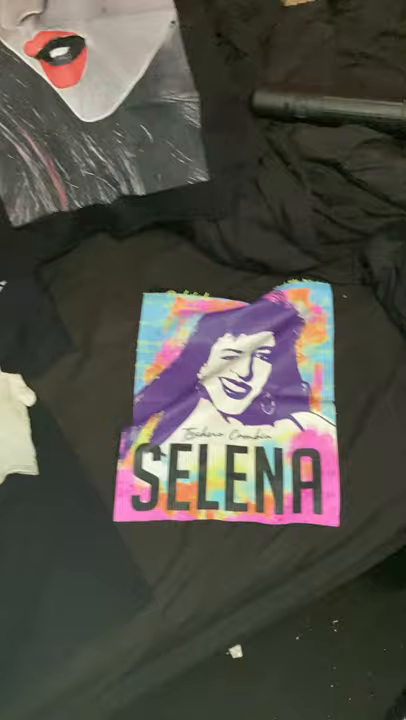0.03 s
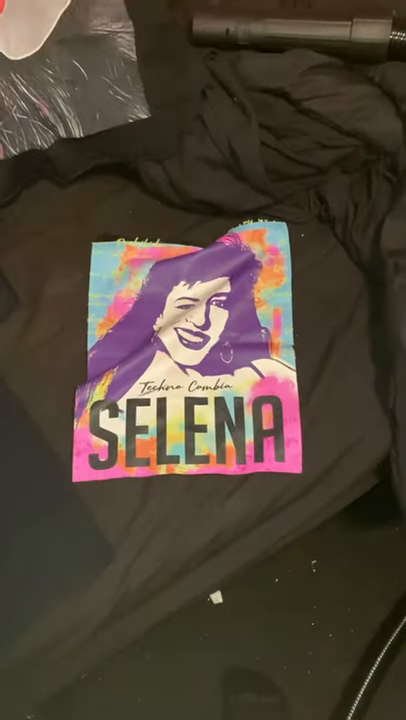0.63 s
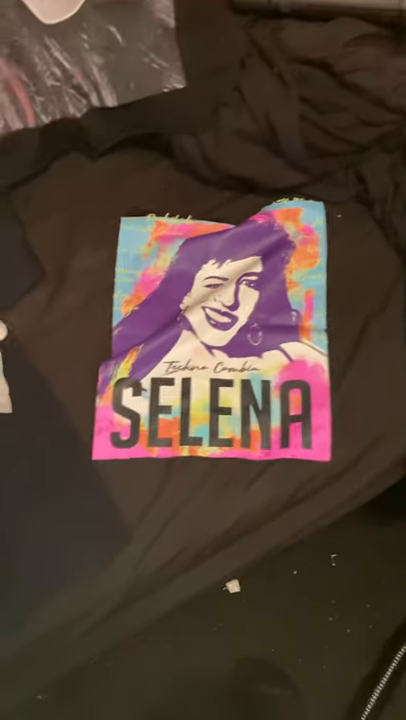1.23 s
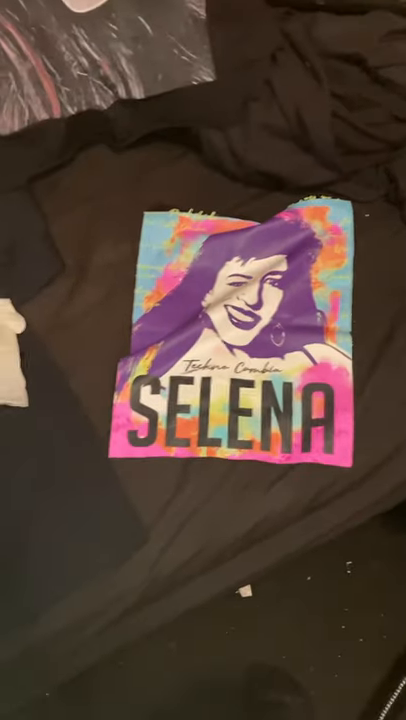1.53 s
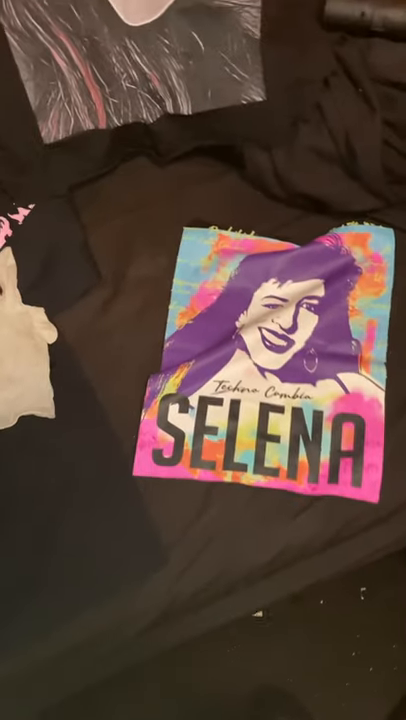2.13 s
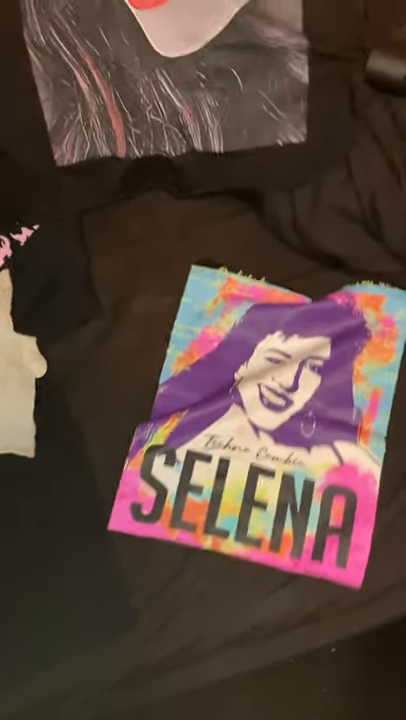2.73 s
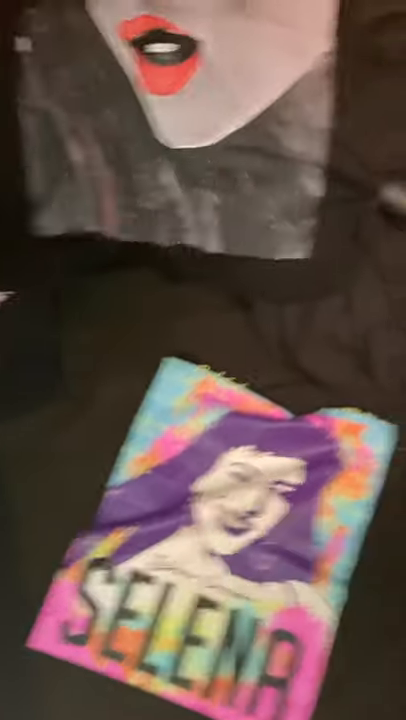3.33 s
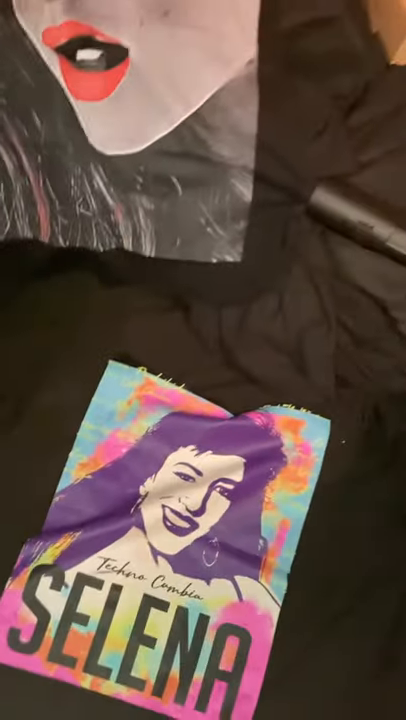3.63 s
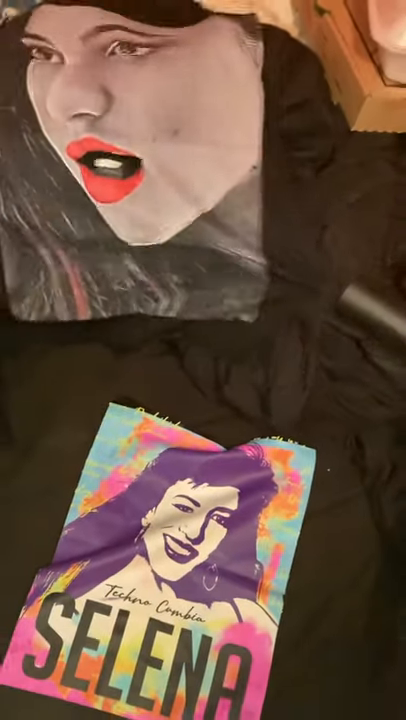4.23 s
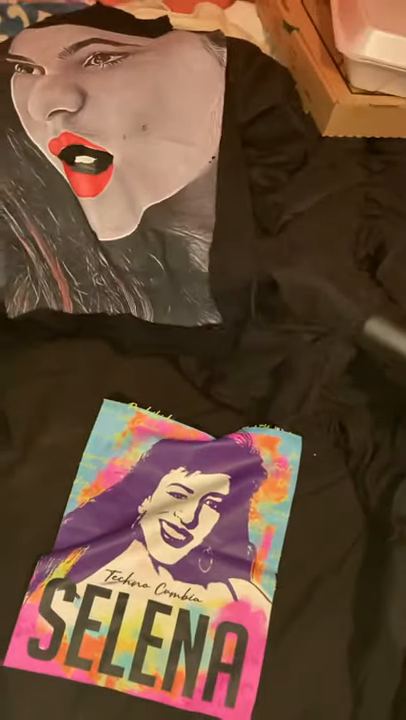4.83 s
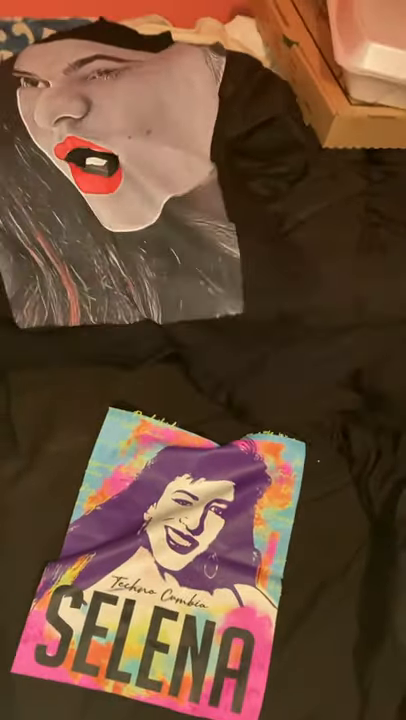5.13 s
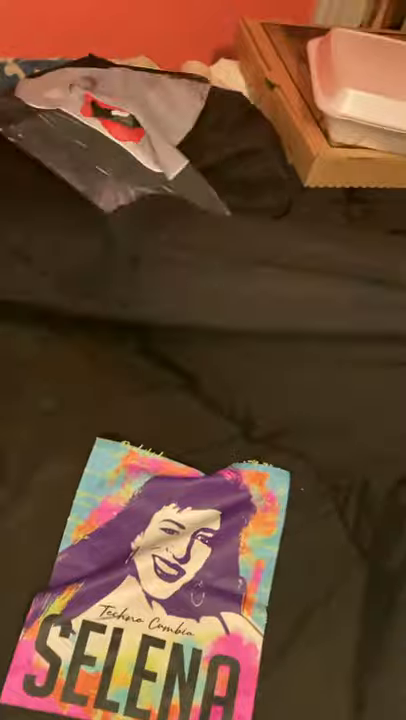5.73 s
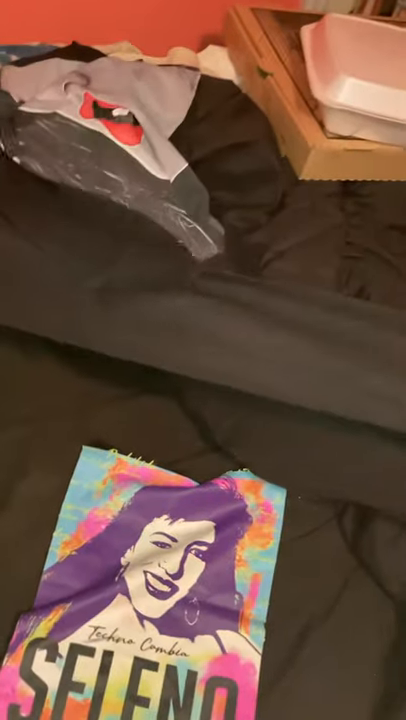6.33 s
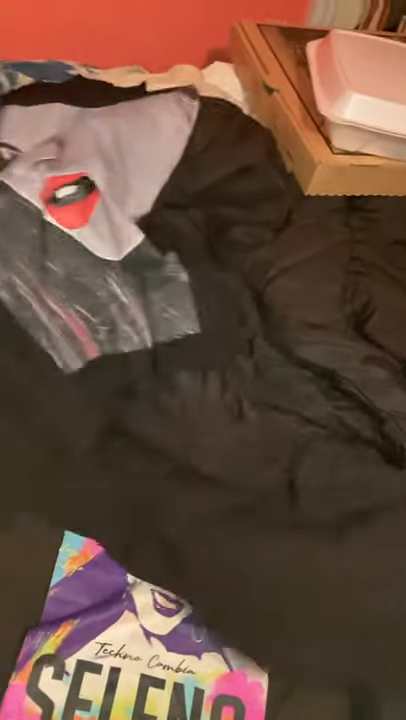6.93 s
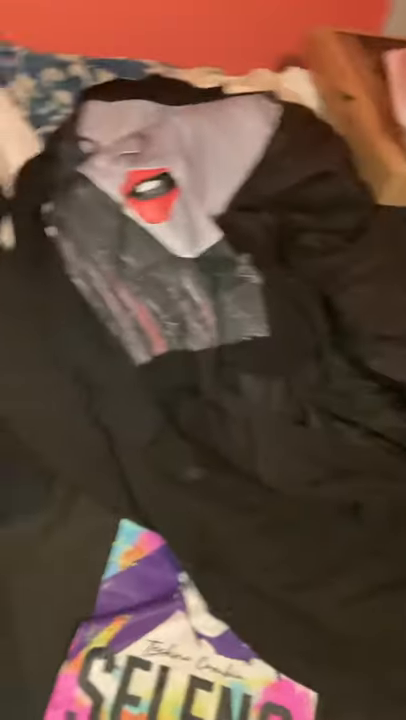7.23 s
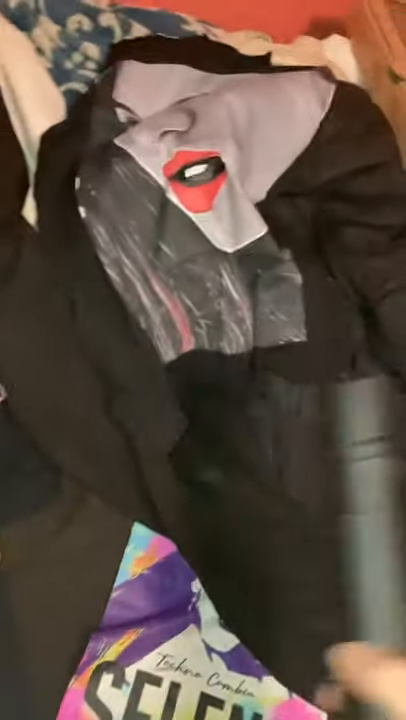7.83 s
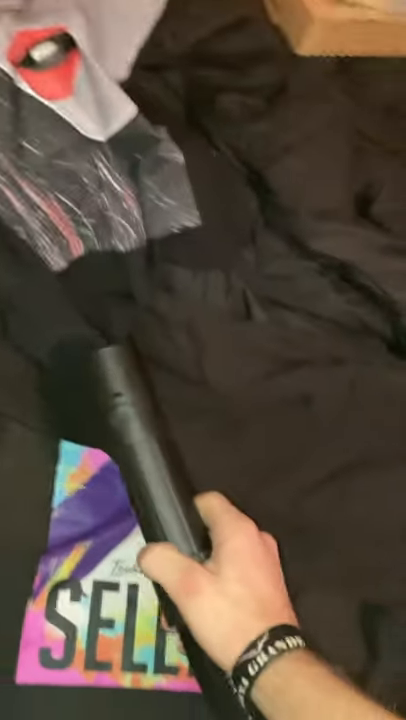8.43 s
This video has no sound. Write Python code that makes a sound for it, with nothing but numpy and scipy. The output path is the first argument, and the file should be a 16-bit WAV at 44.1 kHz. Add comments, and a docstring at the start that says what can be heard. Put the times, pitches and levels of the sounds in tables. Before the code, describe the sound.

After faint hose rubbing, a vacuum cleaner snaps on and runs loudly, sucking at fabric that flaps briefly in the nozzle.

```python
"""Vacuuming shirts on a bed

In a quiet bedroom the hose of a wet-dry vacuum cleaner rubs over the bedding. The switch snaps, the
motor growls with the mains and speeds up; air roars through tank and wand and whistles in the ribbed
hose. Gusts buffet the microphone. The nozzle catches a shirt, which flutters and slaps in the draught;
the whistle stops and the roar turns darker."""
import sys
import numpy as np
from scipy import signal
from scipy.fft import rfft, irfft, next_fast_len
from scipy.io import wavfile

SR = 44100
rng = np.random.default_rng(int(sys.argv[2]) if len(sys.argv) > 2 else 0)


def to_wav(s):
    """Save 16-bit WAV."""
    ch = np.atleast_2d(s).T  # columns
    pcm = np.round(np.clip(ch, -1, 1) * 32767)  # PCM
    wavfile.write(sys.argv[1], SR, pcm.astype(np.int16))


N = 373527
TIME = np.arange(N) / SR
FFT_SIZE = next_fast_len(N)
FREQ = np.maximum(np.arange(FFT_SIZE // 2 + 1) * SR / FFT_SIZE, 1)
SWITCH_ON_S, TOP_SPEED_HZ = 2.18, 503.5
CAUGHT_S, SAG_S = 6.06, .38   # when the nozzle catches the cloth; how long the motor takes to slow

# the air is loudest just after the start, then settles: time_s, boost_db
AIR_SWELL = [(2.2, 6), (3.4, 4.5), (4.4, 1.5), (6.05, 0.5)]


def from_db(db):
    """Turn decibels into a number to multiply by."""
    return 10 ** (np.asarray(db) / 20)


def unit_power(x):
    """Scale a signal to an average power of 1."""
    return x / np.sqrt(np.mean(x ** 2) + 1e-20)


def over_time(rows):
    """Join a table's points with lines: one curve over time for each column after the first."""
    times, *columns = np.transpose(rows)
    return [np.interp(TIME, times, column) for column in columns]


def over_freq(rows):
    """Join a table's points with lines: one curve over frequency for each column after the first."""
    hz, *columns = np.transpose(rows)
    return [np.interp(np.log(FREQ), np.log(hz), column) for column in columns]


def ramp(start_s, length_s):
    """Rise in a straight line from 0 to 1, then stay there."""
    return np.clip((TIME - start_s) / length_s, 0, 1)


def envelope(start_s, end_s, rise_s, fall_s):
    """Grow up to the start, hold at 1 until the end, then die away."""
    return np.exp(-np.maximum(start_s - TIME, 0) / rise_s - np.maximum(TIME - end_s, 0) / fall_s)


def drift(rate_hz):
    """A smooth random wobble, about 1 in size, moving at about the given rate."""
    pole = np.exp(-40 * np.pi * rate_hz / SR)
    steps = rng.standard_normal(N // 20 + 4002)   # one for every 20 samples
    slow = signal.lfilter([1], [1, -2 * pole, pole * pole], steps)[4000:]
    return np.interp(np.arange(N) / 20, np.arange(len(slow)), unit_power(slow))


def phase_of(hz):
    """The running angle, in radians, of a tone whose pitch may change."""
    return 2 * np.pi * np.cumsum(hz) / SR


def panned(db):
    """Left and right gains that make the left louder by the given decibels."""
    return from_db(db * np.array([[.5], [-.5]]))


def stereo_white():
    """The spectrum of white noise as two spaced microphones hear it."""
    # how alike the two sides are: frequency_hz, likeness (0-1), left_lead_radians
    microphone_pair = [(59, 0.85, -0.5), (147, 1, 0), (240, 1, -0.54), (337, 0.96, 0.3), (425, 0.81, -0.66),
                       (570, 0.29, -1), (1120, 0.64, -.5), (1710, 0.57, -0.55), (2230, 0, 2),
                       (3560, 0.36, 3), (4050, 0.22, 2.5), (5550, 0.55, 3.5), (7530, 0.74, 5), (7300, 1, 5),
                       (10770, 1, 8.5), (15900, 1, 13)]
    alike, lead = over_freq(microphone_pair)
    alike = np.clip(alike, 0, .998)
    left, other = rfft(rng.standard_normal((2, FFT_SIZE)))
    right = (alike * left + np.sqrt(1 - alike ** 2) * other) * np.exp(-1j * lead)
    return np.array([left, right])


def to_sound(spectrum):
    """Turn a stereo spectrum into sound of power 1."""
    return unit_power(irfft(spectrum, FFT_SIZE)[:, :N])


def noise(colour):
    """Stereo noise of a given colour: a table of how strong each frequency is."""
    return to_sound(stereo_white() * from_db(over_freq(colour)[0]))


def rough_band(hz, width_hz):
    """A narrow band of stereo noise around a pitch that may move."""
    smoothing = signal.butter(2, width_hz / 2, fs=SR, output="sos")
    a, b = signal.sosfilt(smoothing, rng.standard_normal((2, 2, N)))
    phase = phase_of(hz)
    return unit_power(a * np.cos(phase) + b * np.sin(phase))


def buffets(colour, lumpy_db):
    """Noise that comes in uneven lumps, as moving air does."""
    return unit_power(noise(colour) * from_db(lumpy_db * drift(57)))


def quiet_room(deep_hz=74, upper_hz=148, deep_boost_db=6.5, rumble_db=-63, waver=0.52):
    """The room has a low rumble and a few wavering hum tones."""
    # the two main hums: time_s, deep_db (before its boost), upper_db
    hum_levels = [(0.06, -66, -57), (0.47, -56.5, -74), (0.65, -66, -65), (0.82, -64, -80),
                  (1.47, -58, -70), (1.8, -64, -58), (2.08, -79, -58)]
    # fainter hums: pitch_hz, level_db
    faint_tones = [(127, -66.5), (190, -71.5)]
    # the room's rumble: frequency_hz, level_db
    rumble_colour = [(25, -23), (55, 5.5), (100, -4.5), (125, -10), (147, 5), (175, -24), (220, -13),
                     (300, -19), (500, -32), (1000, -38), (1800, -36), (4500, -39), (7000, -40.5),
                     (15000, -42)]
    deep_db, upper_db = over_time(hum_levels)
    tones = [(deep_hz, deep_db + deep_boost_db), (upper_hz, upper_db)] + list(faint_tones)
    hum = sum(from_db(db) * (1 + waver * drift(12)) * np.sin(phase_of(hz + drift(5.7)))
              for hz, db in tones)
    return (hum + from_db(rumble_db) * noise(rumble_colour)) * panned(2.5)


def hose_rubs(rise_s=0.018, fall_s=0.028, uneven_db=1.5, grain_db=2.0):
    """The hose rubs over the bedding, hollow and grainy, with a thin rasp from its ribs."""
    # each stroke of the hose: start_s, end_s, rub_db, rasp_db
    strokes = [(.47, .59, -80, -81), (0.67, .78, -84, -76), (.83, .91, -85, -81), (1.085, 1.217, -75, -87),
               (1.466, 1.65, -62.5, -82), (1.694, 1.807, -68.5, -89), (1.883, 1.947, -70.5, -92),
               (2.03, 2.06, -77, -92), (2.108, 2.15, -66, -82)]
    # the hollow rub: frequency_hz, level_db
    rub_colour = [(120, -17), (200, -4), (280, 4.5), (400, -10.5), (520, -13), (780, -22), (950, -15.5),
                  (1120, -22), (1360, -14), (1520, -16), (1680, -15), (1850, -24), (2000, -20), (2250, -33),
                  (2600, -39), (4500, -40), (6000, -48), (15000, -56)]
    # the rasp of the ribs: frequency_hz, level_db
    rasp_colour = [(1000, -20), (1800, -10), (2000, -2), (2300, -15), (2650, -12), (2850, -3), (3150, -16),
                   (3600, -19), (4500, 3), (5500, -24), (15000, -35)]
    rub, rasp = noise(rub_colour), noise(rasp_colour)
    out = sum(envelope(start, end, rise_s, fall_s) * (from_db(rub_db) * rub + from_db(rasp_db) * rasp)
              for start, end, rub_db, rasp_db in strokes)
    return out * from_db(uneven_db * drift(14) + grain_db * drift(70))


def plastic_knocks(room_db=-25, room_fade_s=0.71):
    """Plastic parts knock: a bright snap and a hollow thud, then a faint tail in the room."""
    # handling knocks, then the switch: time_s, level_db, rise_s, fade_s (to fall 60 dB), thud_boost_db
    hits = [(0.731, -68.5, 0.003, 0.077, 20), (0.744, -72, 0.003, 0.058, 15),
            (1.428, -63, 0.0079, 0.13, 18), (1.91, -71, 0.01, 0.14, 20.5), (2.147, -37, 0.0088, 0.13, -13),
            (2.159, -26, 0.001, 0.026, -1), (2.166, -32, 0.0013, 0.033, 9), (2.174, -38, 0.0012, 0.045, 11)]
    # the bright snap: frequency_hz, level_db
    snap_colour = [(290, -31), (500, -6), (1210, -16), (1820, -7), (3810, -24.5), (4470, -13.5),
                   (5630, -24), (10100, -30), (12000, -26), (16000, -29)]
    # the hollow thud: frequency_hz, level_db
    thud_colour = [(120, -25), (220, 7), (300, 2.5), (470, 2), (700, -11), (1400, -26), (2600, -60)]
    snap, thud, out = noise(snap_colour), noise(thud_colour), 0
    for time_s, db, rise_s, fade_s, thud_boost_db in hits:
        age = np.clip(TIME - time_s, 0, 2)
        rise = 1 - np.exp(-age / rise_s)
        fade = from_db(-60 * age / fade_s) + from_db(room_db - 60 * age / room_fade_s)
        out = out + from_db(db) * rise * fade * (snap + from_db(thud_boost_db) * thud)
    return out


def hose_squeak(wobble=.018, uneven_db=4):
    """Sliding plastic gives one faint, unsteady squeak that rises and falls."""
    # the path of the squeak: time_s, pitch_hz, level_db
    squeak = [(1.4, 8700, -100), (1.48, 9500, -86), (1.63, 10300, -87), (1.69, 9600, -84),
              (1.87, 8000, -90), (1.93, 7300, -120)]
    hz, db = over_time(squeak)
    level = ramp(squeak[0][0], .02) * from_db(db + uneven_db * drift(12))
    return level * rough_band(hz * (1 + wobble * drift(12)), width_hz=260)


def hose_scrape(level_db=-72):
    """Plastic scrapes on plastic once, short and thin."""
    # the scrape: frequency_hz, level_db
    scrape_colour = [(2000, -25), (2850, 3), (3600, -8), (4700, -2), (5300, -7), (7000, -22), (15000, -30)]
    shape = envelope(start_s=1.514, end_s=1.528, rise_s=.003, fall_s=.014)
    return from_db(level_db) * shape * noise(scrape_colour)


def mains_growl(mains_hz=60, surge_db=-27, surge_s=0.12, running_db=-44):
    """The motor growls as it draws a surge of current at the start, then settles to a hum."""
    # tones of the growl: multiple of the mains frequency, level_db
    growl_tones = [(2, -5), (4, -12), (6, -12), (8, -15.5)]
    growl = sum(from_db(db) * np.sin(2 * np.pi * multiple * mains_hz * TIME + rng.uniform(0, 2 * np.pi))
                for multiple, db in growl_tones)
    surge = np.exp(-np.maximum(TIME - SWITCH_ON_S, 0) / surge_s)
    return growl * (from_db(surge_db) * surge + from_db(running_db))


def shaft_speed(sag_hz=9.3):
    """The motor's turns per second: it speeds up, then slows a little under the load of the cloth."""
    # the speed still to be gained, in a quick and a slow part: missing_hz, decay_s
    run_up = [(185, .135), (226, .46)]
    age = np.maximum(TIME - SWITCH_ON_S, 0)
    missing = sum(hz * np.exp(-age / decay_s) for hz, decay_s in run_up)
    return TOP_SPEED_HZ - missing - sag_hz * ramp(CAUGHT_S, SAG_S)


def doublings(speed):
    """Speed in octaves: 0 at top speed, -1 at half of it."""
    return np.log2(speed / TOP_SPEED_HZ)


def motor_whine(speed, shaft_db=-52, housing_hz=300, housing_width_hz=120, housing_db=20,
                whine_db=-44.5, db_per_doubling=20, wander=0.00122, flicker=0.59):
    """The shaft shakes the housing on the way up; a rough whine above it grows with speed."""
    # tones of the fan blades and the motor's spinning contacts: multiple of shaft speed, level_db
    whine_tones = [(3, -4), (4, -17), (5, -2.5), (6, -20), (7, -15), (8, -5.5), (9, 3.5), (18, -0.5)]
    # how the whine comes and goes at the moving microphone: time_s, boost_db
    whine_boost = [(3.0, 2), (3.6, 2), (4.02, 9.5), (4.2, 5), (4.55, -11), (5.2, 4), (5.6, 2), (6.25, -16),
                   (6.45, 2.5), (6.68, -3), (7.0, 3.5), (7.15, -5), (7.26, 9), (7.4, -4), (7.65, 1),
                   (7.9, 3.5), (8.1, 3), (8.47, 2.5)]
    phase = phase_of(speed * (1 + wander * drift(23.5)))
    whine = np.zeros((2, N))
    for multiple, db in whine_tones:
        for channel in whine:
            level = from_db(db) * (1 + flicker * drift(19))
            channel += level * np.sin(multiple * phase + flicker * drift(40))
    shaking_db = housing_db / (1 + (2 * (speed - housing_hz) / housing_width_hz) ** 2)
    whine_gain = from_db(whine_db + db_per_doubling * doublings(speed) + over_time(whine_boost)[0])
    return from_db(shaft_db + shaking_db) * np.sin(phase) + whine_gain * whine


def brush_rasp(speed, multiple=18, level_db=-51, peak_s=2.25):
    """The motor's brushes scrape over its spinning contacts: a brief, rising rasp."""
    shape = envelope(peak_s, peak_s, rise_s=0.096, fall_s=0.12)
    return from_db(level_db) * shape * rough_band(multiple * speed, width_hz=600)


def airflow(speed, unsteady_db=1.11, hiss_dip_db=-0.5):
    """Churning air rings tank and wand: louder and brighter with speed, darker with cloth on the nozzle."""
    # the air noise with the nozzle open and loaded with cloth: frequency_hz, open_db, loaded_db
    air_colour = [(40, -22, -30), (65, -8.5, -16), (100, -13, -19), (125, 0, -6), (300, -11, -11.4),
                  (560, -14, -4.6), (750, -7.8, -2.1), (1500, -1.4, -3.4), (2500, -2.1, -8.6),
                  (3000, -2.6, -10.4), (4200, -3.4, -7.5), (5200, -6.5, -12.5), (5800, -9, -18),
                  (6500, -8.5, -13), (9000, -4.5, -10.5), (11000, -10.5, -5.5), (15000, -17, -16)]
    # notes at which tank, wand and room ring: pitch_hz, width_hz, open_boost_db, loaded_boost_db
    resonances = [(147, 16.6, 8.5, 11.5), (211, 15.4, 6.5, 12.5), (273.4, 39, 4.5, 12),
                  (325.4, 32, 10.5, 12.5), (407.2, 25, 0, 13.5), (448, 27, 12, 9.5), (493, 16, 9, 4),
                  (620, 43, 6.5, 10.5), (687, 32, 10, 5), (824, 74, 8, 5.5), (995, 26, 3, 7.5),
                  (1059, 43, 4.5, 7), (1150.0, 83, 5, 4.5), (1284, 25, 2.5, 5), (1640, 130, 2, 3.5),
                  (1740, 46, 8.5, 0.5), (1920, 53, 6, 2.5), (1963, 58, 2, 7), (2160, 62, 0.5, 2.5),
                  (2470, 74, 4, 7.5), (2580, 45, 2, 1), (2650, 86, -1, 6.5), (2860, 180, -6.5, 3.5),
                  (3200, 36, 5, 3.5), (3895, 82, 6.5, 2), (4580, 62, -3.5, 6.5)]
    # load on the nozzle: time_s, load (0 open, 1 loaded)
    nozzle_load = [(2.16, 0.45), (2.6, 0.34), (3.0, 0.16), (6.05, 0.23), (6.4, 0.29), (6.8, 0.91),
                   (8.47, 0.98)]
    # borders of the four bands, which are drone, roar, rush and hiss: frequency_hz
    edges = [20, 550, 2000, 7000, 16000]
    # each band: open_db, loaded_db, db_per_doubling of speed, swell_share, cloth_lifted_db, pan_db
    bands = [(-39, -32.5, 11, 1, -0.5, .5), (-33, -29, 9.5, 0.99, -0.5, -0.2),
             (-27.5, -30.5, 19, 0.82, -0.5, -0.5), (-30, -28, 19, 0.72, -4, 0)]
    open_colour, loaded_colour = over_freq(air_colour)
    for hz, width_hz, open_boost_db, loaded_boost_db in resonances:
        peak = 1 / (1 + (2 * (FREQ - hz) / width_hz) ** 2)
        open_colour = open_colour + open_boost_db * peak
        loaded_colour = loaded_colour + loaded_boost_db * peak
    white = stereo_white()
    open_air, loaded_air = white * from_db(open_colour), white * from_db(loaded_colour)
    load, swell_db = over_time(nozzle_load)[0], over_time(AIR_SWELL)[0]
    caught = load * ramp(CAUGHT_S, SAG_S)
    lifted = envelope(start_s=6.32, end_s=6.7, rise_s=0.12, fall_s=0.41)
    out = 0
    for low_hz, high_hz, settings in zip(edges, edges[1:], bands):
        open_db, loaded_db, db_per_doubling, swell_share, cloth_lifted_db, pan_db = settings
        band = (FREQ >= low_hz) & (FREQ < high_hz)
        db = open_db + (loaded_db - open_db) * caught + db_per_doubling * doublings(speed)
        db += swell_share * swell_db + cloth_lifted_db * lifted
        if high_hz == edges[-1]:   # what the hose turns into whistle is taken from the hiss
            db += hiss_dip_db * whistling()
        air = (1 - load) * to_sound(open_air * band) + load * to_sound(loaded_air * band)
        out = out + from_db(db + unsteady_db * drift(16.0)) * panned(pan_db) * air
    return out


def wandering_echoes(x, count=7, first_s=.003, last_s=.022, sway_s=0.0001395, echo_db=-4, low_cut_hz=600):
    """Echoes off walls and furniture shift as the microphone moves, so hollow notes come and go."""
    bright = signal.sosfilt(signal.butter(2, low_cut_hz, "high", fs=SR, output="sos"), x)
    echoes = 0
    for delay_s in np.geomspace(first_s, last_s, count):
        earlier = TIME - delay_s - sway_s * drift(0.61)
        echoes = echoes + np.array([np.interp(earlier, TIME, channel) for channel in bright])
    return x + from_db(echo_db) * echoes / np.sqrt(count)


def fan_howl(speed):
    """Swirling air behind the fan blades makes rough howls that climb with the motor's speed."""
    # swells as the fan passes the tank's ringing notes:
    # peak_s, multiple of shaft speed, width_hz, level_db, rise_s, fall_s
    howls = [(2.37, 5.1, 420, -30.5, 0.045, 0.16), (2.48, 6.3, 400, -37, .04, .15),
             (3, 3.2, 320, -30.5, 0.1, 0.17), (3.06, 3.7, 210, -30, 0.25, 0.55),
             (2.86, 5.5, 250, -27, 0.015, 0.78), (3.25, 7.27, 90, -32, 0.27, 0.39),
             (3.4, 9, 40, -39, 0.25, .2)]
    return sum(from_db(db) * envelope(peak_s, peak_s, rise, fall) * rough_band(multiple * speed, width)
               for peak_s, multiple, width, db, rise, fall in howls)


def exhaust(puff_s=2.53, puff_db=-26):
    """The tank starts to blow with one deep puff, and short gusts hit the microphone."""
    # the deep puff: frequency_hz, level_db
    puff_colour = [(20, -22), (45, 0), (80, -4), (130, -3), (210, 2), (300, -11), (500, -28), (1000, -50)]
    # each gust: peak_s, level_db
    gust_peaks = [(2.41, -36), (2.535, -19.5), (2.768, -22), (2.82, -26), (2.955, -21.5), (3.04, -22),
                  (3.11, -19.5), (3.155, -26), (3.3, -35), (7.72, -28.5), (7.8, -41), (8.13, -35)]
    # wind on the microphone: frequency_hz, level_db
    gust_colour = [(18, -56), (30, -30), (91, -29), (140, 6.5), (187, -11), (250, -3), (340, -7.5),
                   (410, -7.5), (552, -26), (700, -14), (910, -36), (1540, -120)]
    puff = from_db(puff_db) * envelope(puff_s, puff_s, rise_s=0.061, fall_s=0.046)
    gusts = sum(from_db(db) * envelope(s, s, rise_s=0.027, fall_s=0.034) for s, db in gust_peaks)
    return puff * buffets(puff_colour, lumpy_db=-0.5) + gusts * buffets(gust_colour, lumpy_db=2.0)


def air_chirps(length_s=0.016, rise_hz_per_s=500, wobble=0.0041, left_lead_radians=0.87):
    """The air locks onto a note of hose or wand for a moment; each chirp bends slightly upward."""
    # short whistles: peak_s, pitch_hz, level_db
    notes = [(2.44, 1940, -37), (2.53, 2945, -34), (2.635, 2945, -34), (2.73, 2955, -38), (4.05, 3805, -32),
             (4.15, 3820, -28), (4.552, 3840, -30), (4.604, 3835, -30), (4.75, 3815, -42),
             (5.01, 3845, -33), (5.1, 3825, -35), (5.543, 3850, -33), (5.6, 3900, -31.5)]
    out, unsteady = np.zeros((2, N)), 1 + wobble * drift(42)
    for peak_s, hz, db in notes:
        near = np.abs(TIME - peak_s) < .1
        age = TIME[near] - peak_s
        phase = phase_of((hz + rise_hz_per_s * age) * unsteady[near])
        level = np.sqrt(2) * from_db(db) * np.exp(-(age / length_s) ** 2)
        out[:, near] += level * np.sin([phase + left_lead_radians, phase])
    return out


def whistling():
    """How much whistle there is, 0 to 1: it fades in as the air gets fast and out as cloth is caught."""
    return ramp(start_s=2.95, length_s=0.39) * (1 - ramp(CAUGHT_S + 0.022, length_s=0.12))


def hose_whistle(speed, base_hz=8995, hz_per_shaft_hz=7.5, creep_hz_per_s=40, level_db=-29.5,
                 side_db=-10, flicker_db=1.5, waver=.0012):
    """Air over the hose's ribs sings high, flickering notes that follow the motor and creep upward."""
    # the hose's notes: ratio to the whistle's pitch, width_hz, level_db
    hose_notes = [(.9, 120, -13), (.972, 120, -10), (1, 45, 0), (1.026, 50, -1), (1.051, 70, -4),
                  (1.077, 90, -7)]
    pitch = base_hz + hz_per_shaft_hz * (speed - TOP_SPEED_HZ) + creep_hz_per_s * (TIME - SWITCH_ON_S)
    out = 0
    for ratio, width_hz, db in hose_notes:
        phase = phase_of(pitch * ratio * (1 + waver * drift(3)))
        middle, side = [drift(width_hz / 2) * np.cos(phase) + drift(width_hz / 2) * np.sin(phase)
                        for _ in range(2)]
        note = middle + from_db(side_db) * side * [[1], [-1]]   # spread between left and right
        out = out + from_db(db + flicker_db * drift(2.4)) * note
    return unit_power(out) * whistling() * from_db(level_db + over_time(AIR_SWELL)[0])


def wand_whistle(pitch_hz=3820, width_hz=55, flicker_db=2.0):
    """At full flow the open wand sings a narrow, uneven note."""
    # how loud the wand sings: time_s, level_db
    wand_level = [(3.5, -57), (4.0, -31), (4.25, -34), (4.45, -45), (5.1, -32), (5.3, -53), (6.05, -46)]
    level = whistling() * from_db(over_time(wand_level)[0] + flicker_db * drift(13))
    return level * rough_band(np.full(N, pitch_hz), width_hz)


def cloth_rumble(level_db=-20.5):
    """The caught cloth rumbles in the draught: it builds up, holds and slips away."""
    # the cloth's rumble: frequency_hz, level_db
    cloth_colour = [(53, -33), (90, -10), (103, -17), (155, 5), (183, -11), (279, -1.5), (347, -12),
                    (391, 1.5), (568, -16), (672, -7), (876, -18), (1230, -14), (1600, -15), (2080, -40),
                    (3520, -120)]
    shape = envelope(start_s=6.22, end_s=6.506, rise_s=0.1, fall_s=0.1)
    return from_db(level_db) * shape * buffets(cloth_colour, lumpy_db=1.0) * panned(0.4)


def cloth_flutter(start_hz=95, slowing_hz_per_s=57, level_db=-20.0, jitter=0.091,
                  uneven_db=-0.5, overtone_db=-13):
    """The cloth flaps almost regularly in the draught, slower and heavier as it goes."""
    rate_hz = start_hz - slowing_hz_per_s * np.clip(TIME - CAUGHT_S, 0, 1)
    phase = phase_of(rate_hz * (1 + jitter * drift(27.4)))
    tone = np.sin(phase) + from_db(overtone_db) * np.sin(2 * phase)
    flaps = unit_power(tone * from_db(uneven_db * drift(28.2)))
    shape = envelope(start_s=6.5, end_s=6.62, rise_s=0.18, fall_s=0.034)
    return from_db(level_db) * shape * flaps * panned(2.5)


def cloth_slaps():
    """Folds of the caught cloth snap tight and set the wand's hollow notes ringing."""
    # each slap: time_s, strength_db
    slaps = [(6.084, -25), (6.133, -23), (6.226, -11), (6.312, -18), (6.378, -13), (6.4152, -11.5),
             (6.4432, -10), (6.4535, -16), (6.470, -11.5), (6.583, -16)]
    # the wand's hollow notes: pitch_hz, level_db, decay_s
    wand_notes = [(283, -0.5, 0.012), (397, -11.5, 0.0079), (680, -17, 0.0037)]
    hits = np.zeros(N)
    for time_s, db in slaps:
        hits[int(time_s * SR)] = from_db(db)
    age = TIME[:SR // 10]
    ringing = sum(from_db(db) * np.exp(-age / decay_s) * np.sin(2 * np.pi * hz * age)
                  for hz, db, decay_s in wand_notes)
    return signal.oaconvolve(hits, ringing)[:N]


def cloth_buzz(rise_s=0.013, fall_s=.022):
    """The edge of the cloth buzzes low as it is drawn in and rasps higher as it is pulled free."""
    # each buzz in the nozzle: start_s, end_s, pitch_hz, width_hz, level_db
    buzzes = [(6.175, 6.337, 388, 55, -25), (6.38, 6.44, 1403, 400, -33), (6.563, 6.595, 1265, 60, -26),
              (6.568, 6.638, 1470, 400, -28.5)]
    return sum(from_db(db) * envelope(start, end, rise_s, fall_s) * rough_band(np.full(N, hz), width)
               for start, end, hz, width, db in buzzes)


def scene():
    """Mix it all: air and motor sound once the switch is on, the cloth once it is caught."""
    speed = shaft_speed()
    air = wandering_echoes(airflow(speed)) + fan_howl(speed)
    air = air + hose_whistle(speed) + wand_whistle() + air_chirps() + exhaust()
    motor = motor_whine(speed) + brush_rasp(speed) + mains_growl()
    machine = ramp(SWITCH_ON_S, .01) * (air + motor)
    cloth = ramp(CAUGHT_S, 0.027) * (cloth_rumble() + cloth_flutter() + cloth_slaps() + cloth_buzz())
    handling = plastic_knocks() + hose_rubs() + hose_scrape() + hose_squeak()
    return machine + cloth + handling + quiet_room()


def record(dry, low_cut_hz=36, high_cut_hz=15900):
    """Soften the deepest bass and cut off the highest treble steeply."""
    lean = signal.sosfilt(signal.butter(2, low_cut_hz, "high", fs=SR, output="sos"), dry)
    return signal.sosfilt(signal.ellip(12, .1, 80, high_cut_hz, fs=SR, output="sos"), lean)


dry = scene()
out = record(dry)
to_wav(out)
```